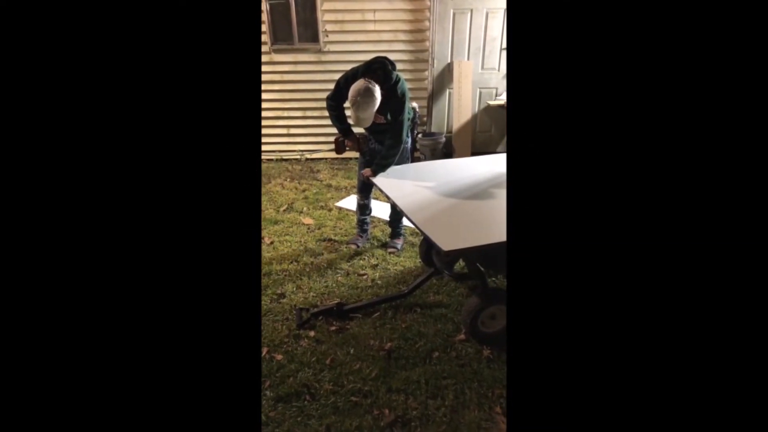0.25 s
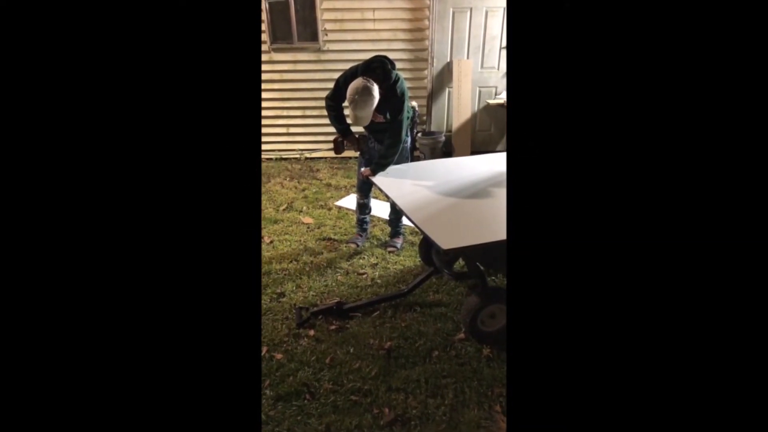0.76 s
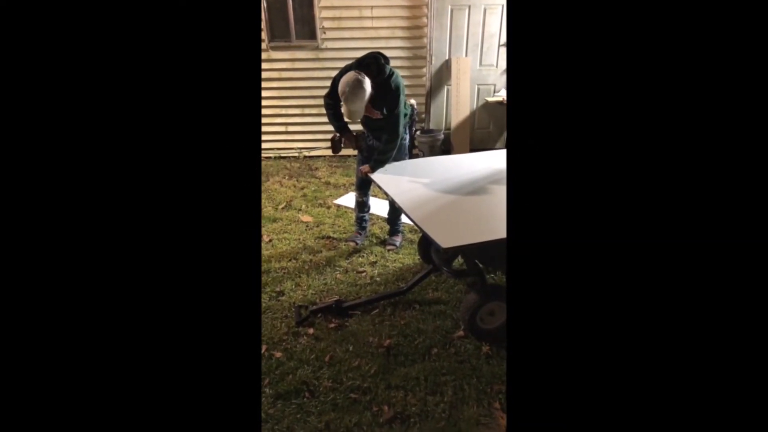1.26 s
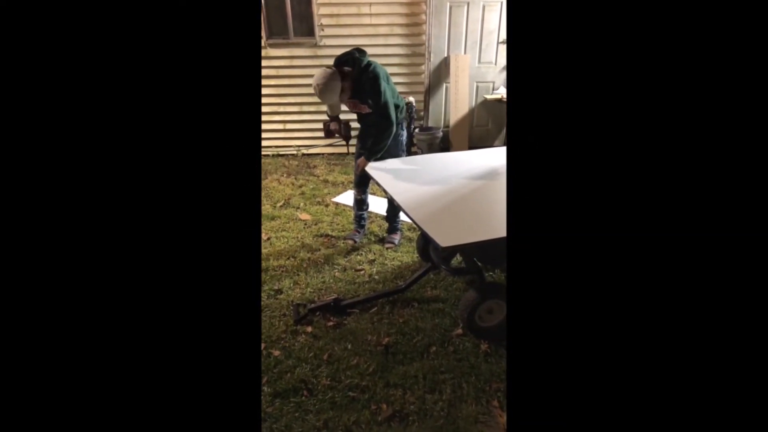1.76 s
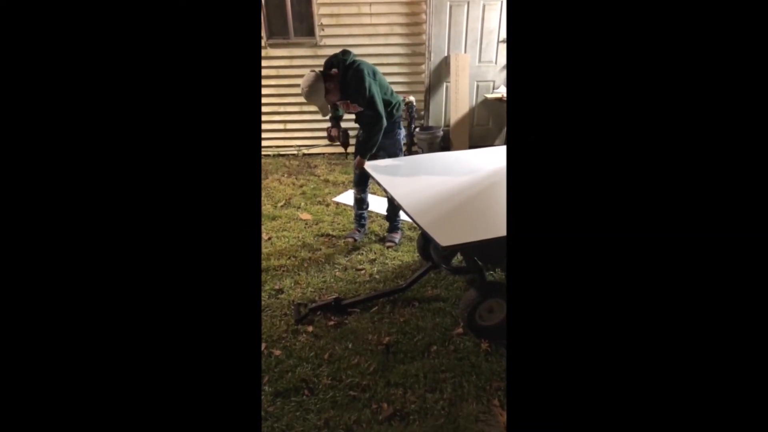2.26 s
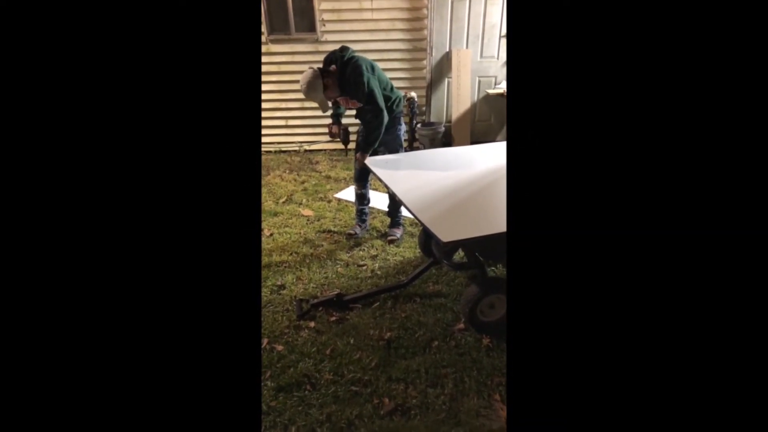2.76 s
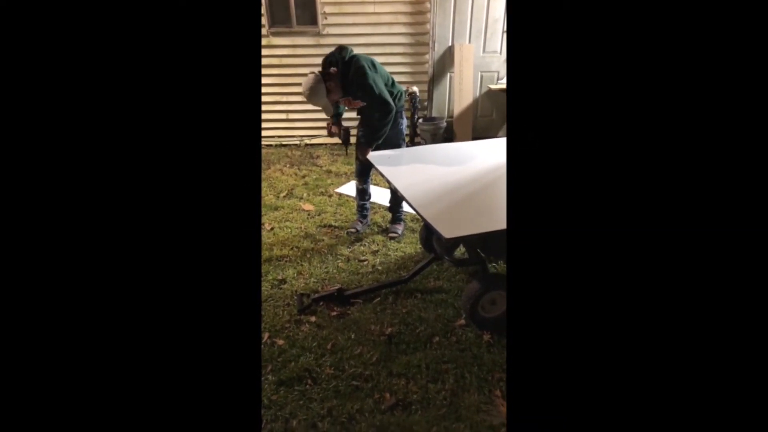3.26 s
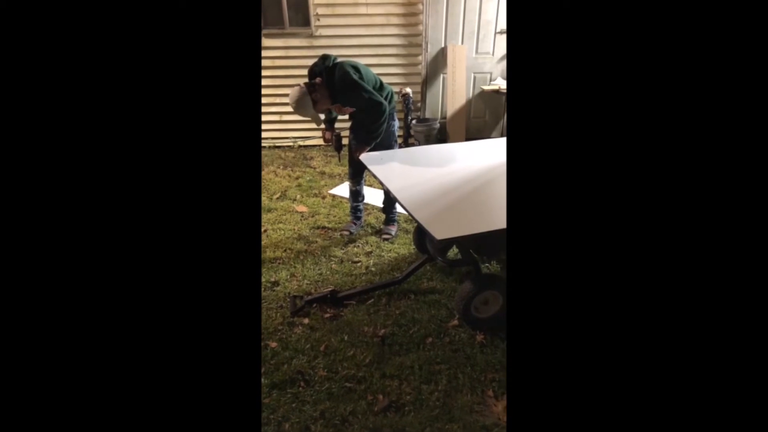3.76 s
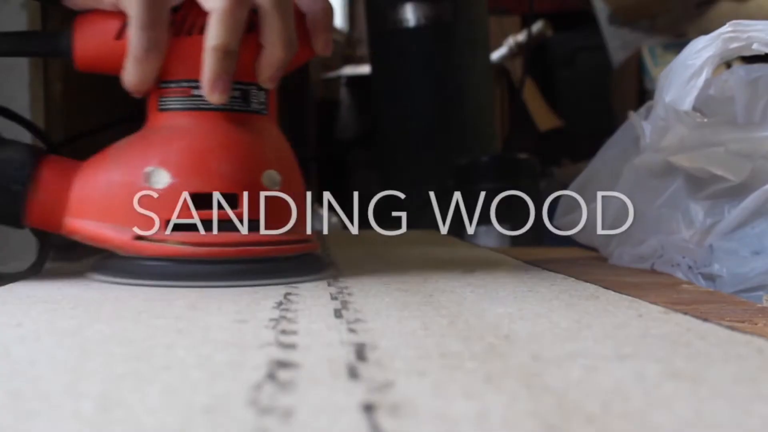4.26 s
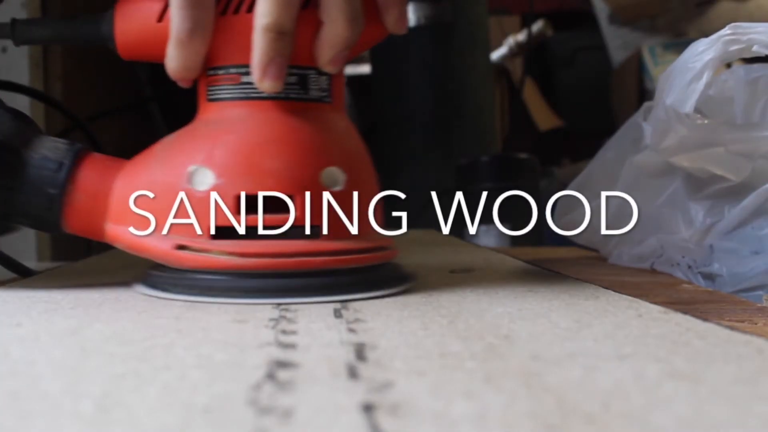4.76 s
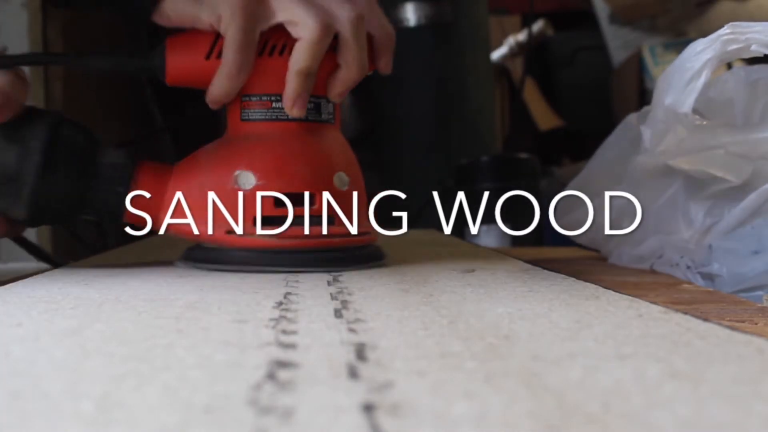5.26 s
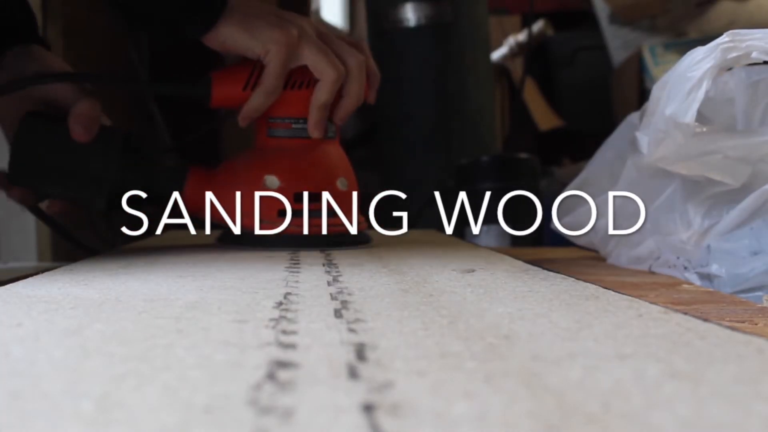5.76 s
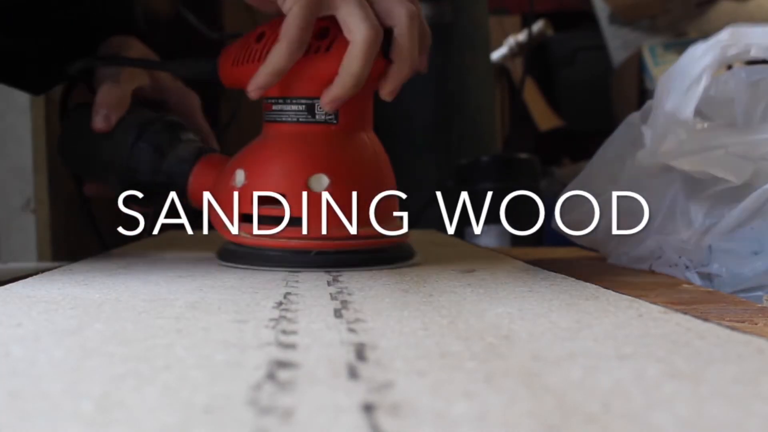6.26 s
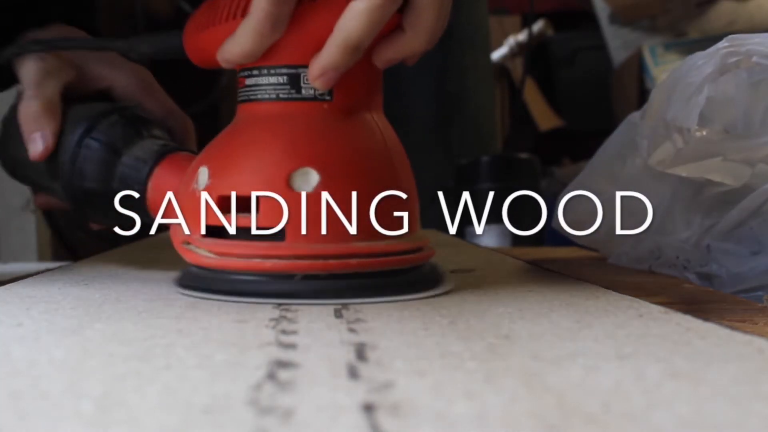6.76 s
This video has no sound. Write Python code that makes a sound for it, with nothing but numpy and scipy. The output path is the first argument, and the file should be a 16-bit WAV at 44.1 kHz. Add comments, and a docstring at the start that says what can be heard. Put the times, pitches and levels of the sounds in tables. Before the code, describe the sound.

An impact driver whines and briefly hammers a screw tight outdoors, then an orbital sander drones and rasps steadily on wood.

```python
"""In a quiet back yard an impact driver whines up, runs a screw in, slows under the load and hammers
it tight; a house wall answers. A few small handling clicks follow over distant machinery hum.
At about 4.2 s the scene cuts hard to a workshop: a random orbital sander, close by, is pressed onto
a wood panel and moved slowly about. Its weight shakes, its fan sings and its grit rasps, while the
panel drums and now and then bumps on the bench."""
import sys
import numpy as np
from scipy import signal
from scipy.fft import rfft, irfft, next_fast_len
from scipy.io import wavfile
from scipy.ndimage import uniform_filter1d, map_coordinates

SR = 44100
rng = np.random.default_rng(int(sys.argv[2]) if len(sys.argv) > 2 else 0)


def to_wav(sig):
    """Store sig (one row per channel, or 1-D mono) as 16-bit WAV at the path in sys.argv[1].

    Samples outside -1..1 are clipped; the rate is SR.
    """
    pcm = np.clip(np.atleast_2d(sig), -1, 1) * 32767
    pcm = np.round(pcm).astype(np.int16)
    wavfile.write(sys.argv[1], SR, pcm.T)  # frames by channels


N = 308685
T = np.arange(N) / SR
TRIGGER_S, SEATED_S, LET_GO_S = .435, .98, 1.15  # trigger pulled, screw seated, trigger let go

# hiss of grit on wood: f/Hz, level/dB (levels in all tables are relative)
GRIT = [(800, -23), (2000, 6.5), (3000, -1), (4000, 0.5), (5000, -1), (6500, 0), (8200, 0), (10500, -3),
        (12500, -12), (15000, -25), (15600, -47.5)]


def driver(level_db=-43.3, turns_per_chuck=4.35, whine_db=1, clatter_db=-8.5, gears_db=-1):
    """Motor and gear teeth whine through the case; the mesh tightens once each turn of the chuck."""
    # whine partials: multiple of the rotor, level/dB, throb/dB, gain at full load/dB
    partials = [(6.17, -10, 1, 0), (6.3, -9, 2, 0), (12.6, -10, 7, 8), (18, -6, 2, -5), (18.4, -11, 7, -3),
                (18.9, -13, 7, -3), (24.6, -17, 7, 13), (30, -8, .5, 0), (35, -11, 7, 0)]
    # gear case resonances: f/Hz, level/dB
    housing = [(600, -15), (1350, -7.5), (1700, -4), (2100, -9.5), (2800, -4), (3350, -3), (3900, -7),
               (4500, -7.5), (5050, -0.5), (5700, -6.5), (7000, -6.5), (8200, -6.5), (12000, -11.5)]
    # gear noise: f/Hz, level/dB
    gear_colour = [(47, -37.5), (80, -1.5), (107, -4), (185, -2.5), (544, -14), (903, -8.5), (1050, -13),
                   (1710, -4.5), (1910, -12), (3310, -12.5), (3620, -14), (5040, -5.5), (5750, -12),
                   (15500, -14.5)]
    rotor_hz, load, drive = driver_motion()
    rotor = angle(rotor_hz)
    throb = np.sin(rotor / turns_per_chuck + .2 * wobble(30))
    teeth = sum(amp(db + load_db * load + throb_db * (throb - .5))
                * tone(k * rotor + .06 * throb_db * wobble(130))
                for k, db, throb_db, load_db in partials)
    whine = amp(whine_db) * drive ** 3 * filtered(teeth, lambda hz: amp(along(housing, hz)))
    sharp_housing = [(hz, 2 * db) for hz, db in housing]  # backlash knocks ring the case sharply
    clatter = amp(clatter_db) * noise(sharp_housing, (1 + throb) ** 2)
    gears = amp(gears_db) * noise(gear_colour, amp(throb))
    return amp(level_db) * drive * (whine + clatter + gears)


def driver_motion(free_hz=275.5, loaded_hz=166, spin_up_s=.056, tighten_s=.06, brake_s=.012):
    """The rotor runs up, slows as the screw seats, then brakes: speed/Hz, load 0-1, drive 0-1."""
    run_up = 1 - np.exp(-np.maximum(T - TRIGGER_S, 0) / spin_up_s)
    load = np.exp(np.minimum(T - SEATED_S, 0) / tighten_s)
    drive = run_up * np.exp(-np.maximum(T - LET_GO_S, 0) / brake_s)
    return drive * (free_hz + (loaded_hz - free_hz) * load), load, drive


def hammer(snap_db=-5, crack_db=-1, thud_db=-1.8, clang_db=-7, bite_db=-24):
    """Each blow snaps and cracks on the steel anvil, thuds into the workpiece and rings the sheet."""
    # hammer blows: t/s, crack level/dB, thud level/dB
    blows = [(0.9877, -17.5, -25.5), (1.0137, -18.5, -22.5), (1.0412, -20.5, -21), (1.0667, -18, -21.5),
             (1.0955, -18, -19), (1.131, -23, -26), (1.147, -39, -30.5), (1.155, -44, -37),
             (1.162, -38.5, -56)]
    # bright leading snap: f/Hz, level/dB
    steel = [(2000, -20.5), (6000, -4), (10000, 4), (15500, -4)]
    # crack of the anvil: f/Hz, level/dB
    anvil = [(300, -17), (900, 4), (1700, -4.5), (3000, -2), (5000, 0), (7000, -7.5), (9500, -4.5),
             (12000, -14.5), (15500, -2.5)]
    # body of the thud: f/Hz, level/dB
    workpiece = [(30, -38.5), (70, -7.5), (135, -8), (186, 13.5), (252, -10.5), (341, 7), (400, -3.5),
                 (580, -11.5), (800, -9.5), (1730, -10), (2500, -15.5), (2800, -10), (5000, -31.5),
                 (9000, -60.5), (12000, -59.5)]
    # the sheet rattling under the screw head: f/Hz, level/dB
    rattle = [(400, -24), (1200, -3), (1700, 0), (2400, -2), (3500, -15), (8000, -36)]
    # the screw head grinding in, just ahead of the first blow: f/Hz, level/dB
    grind = [(200, -12), (750, 0), (1600, -7), (5000, -14), (12000, -26)]
    snap = sum(amp(db + snap_db) * decay(s, t60=.012, attack=.0005) for s, db, _ in blows)
    crack = sum(amp(db + crack_db) * decay(s, t60=.062, attack=.001) for s, db, _ in blows)
    thud = sum(amp(db + thud_db) * decay(s, t60=.145, attack=.0029) for s, _, db in blows)
    clang = sum(amp(db + clang_db) * decay(s, t60=.085, attack=.004) for s, _, db in blows)
    bite = amp(bite_db) * decay(SEATED_S - .002, t60=.07, attack=.005)
    ring = sheet_ring(blows)
    impact = snap * noise(steel) + crack * noise(anvil) + thud * noise(workpiece)
    return impact + clang * noise(rattle) + bite * noise(grind) + ring


def sheet_ring(blows, level_db=-4.5):
    """Every blow rings the fastened sheet; each mode takes a cycle or so to build up."""
    # sheet modes: f/Hz, level/dB, t60/s
    modes = [(75.4, -4.5, 0.25), (176, -9, .18), (296, -9, 0.24), (538, -12, .2), (748, -7, 0.12),
             (1007, -13, .15), (1216, -13.5, .15), (1410, -13.5, .16), (1588, -12.5, .16), (1635, -10, .16),
             (1846, -11.5, 0.1), (2250, -14, .15), (2850, -16, .15)]
    t = np.arange(SR // 2) / SR
    out = np.zeros(N)
    for s, _, thud_db in blows:
        ring = sum(amp(db + rng.normal(0, 2) - 60 * t / t60)
                   * np.sin(2 * np.pi * hz * t) * (1 - np.exp(-t * hz)) for hz, db, t60 in modes)
        out[round(s * SR):][:len(t)] += amp(thud_db + level_db) * ring
    return out


def sander(pad_ratio=.98, load_db_per_hz=.4, near_share=.4):
    """The shaft slows as the hand bears down; the free-spinning pad lags a little behind it."""
    # the push away and draw back: t/s, shaft f/Hz, shake level/dB, fan level/dB, grit level/dB
    stroke = [(4.24, 191.9, -19.5, -33.5, -30.5), (4.4, 188.7, -18, -32, -30.3),
              (4.65, 178, -20.5, -34, -30), (4.85, 174.7, -20, -31, -29.5),
              (5.25, 169.8, -21, -32.5, -30.4), (5.8, 168.4, -24.5, -26.5, -27.7),
              (6.15, 169, -24, -27.7, -28.4), (6.6, 171, -21.2, -24.8, -28.5), (7.0, 170.6, -21, -29, -29)]
    shaft_hz, shake_db, fan_db, grit_db = curves(stroke)
    shaft = angle(shaft_hz)
    orbit = pad_ratio * shaft + .22 * wobble(9)
    load_db = load_db_per_hz * (shaft_hz.min() - shaft_hz) + 1  # harder knocks as the motor slows
    near_db = near_share * (shake_db - shake_db[-1])  # more roar where the shake is strong
    drone = sander_motor(shaft, shake_db, fan_db) + drumming(shaft)
    return drone + sander_pad(orbit, load_db, near_db, grit_db) + bumps()


def sander_motor(shaft, shake_db, fan_db, mains_hz=60, ripple=.66, swing_rad=.37):
    """The eccentric weight shakes the tool; torque ripple at twice mains gives the fan sidebands."""
    # fan blade tones: multiple of the shaft, level/dB
    partials = [(12, -1), (24, -18.5)]
    # the fan tone sinks briefly: t/s, length/s, depth/dB
    dips = [(5.44, .1, 4), (6.06, .25, 14)]
    shake = amp(shake_db + .35 * wobble(22)) * tone(shaft)
    torque = angle(np.full(N, 2 * mains_hz))
    blades = sum(amp(db + wobble(40)) * tone(k * shaft + swing_rad * np.sin(torque) + .2 * wobble(35))
                 for k, db in partials)
    waver_db = 1.5 * wobble(16) - sum(db * swell(s, length) for s, length, db in dips)
    return shake + amp(fan_db + waver_db) * (1 + ripple * np.cos(torque)) * blades


def drumming(shaft, level_db=-1.3, far_end_s=5.8):
    """Shaft and pad both drive the panel's low tones, which throb as the two slide out of step."""
    # panel tones along the stroke: t/s, then level/dB at 2, 3 and 4 times the shaft speed
    levels = [(4.26, -42, -33, -28.5), (4.55, -35, -34, -28), (4.7, -30, -25.5, -23.5),
              (5.0, -32.5, -23, -22.8), (5.55, -31.5, -32, -28.5), (5.95, -24.5, -30, -32),
              (6.15, -26.5, -28, -30), (6.7, -28, -35, -24), (6.97, -28.5, -23, -26)]
    # throb of each tone: beat f/Hz, crest t/s
    throbs = [(12.3, 4.723), (13.35, 4.685), (13.7, 4.975)]
    depth = .74 * (1 - .6 * swell(far_end_s, length=1.3))  # calmer at the far end of the stroke
    out = np.zeros(N)
    for k, (db, (beat_hz, crest_s)) in enumerate(zip(curves(levels), throbs), 2):
        drive = k * shaft + .14 * wobble(20)
        slip = 2 * np.pi * beat_hz * (T - crest_s)
        pair = tone(drive) + depth * tone(drive - slip + .25 * wobble(20))
        out += amp(db + level_db + .6 * wobble(12)) * unit(pair)
    return out


def sander_pad(orbit, load_db, near_db, grit_db, panel_db=-22, rub_db=-7, scrape_db=3, rasp_follow=.42):
    """Once an orbit the pad knocks on the panel, chatters at its rim and drags grit over the wood."""
    # buzz of the knocking pad: multiple of the orbit, level/dB
    pad_partials = [(5, -17), (6, -16), (9, -23), (10, -29), (11, -28), (14, -26), (15, -20.5)]
    # buzz of the rim: multiple of the orbit, level/dB
    rim_partials = [(7, -8), (8, -4.5)]
    # roar of the rubbed panel: f/Hz, level/dB
    wood = [(25, -25), (70, -22.5), (120, -14.5), (230, -12.5), (310, -2), (420, 3), (600, 1.5),
            (780, -0.5), (950, -6), (1300, -12), (3000, -47)]
    # rasp of the rim: f/Hz, level/dB
    chatter = [(400, -30), (900, -10), (1300, 3.5), (1650, -10), (2300, -1.5), (2800, -3.5), (4000, -9),
               (8000, -39)]
    panel_gain = amp(panel_db + 1.1 * wobble(18))
    rim_db = rim_level()
    scrape = (.47 * np.cos(orbit) + .72 * np.cos(2 * orbit + wobble(6))
              + .42 * np.cos(3 * orbit + wobble(6.5)))
    contact = amp(scrape_db * scrape)
    knock = amp(load_db) * buzz(orbit, pad_partials)
    roar = amp(rub_db + near_db) * patchy(noise(wood, contact), depth_db=1.5)
    rasp_db = grit_db + rasp_follow * (rim_db - grit_db) - 1.3
    rasp = amp(rasp_db) * patchy(noise(chatter, contact), depth_db=3)
    grains = noise(GRIT, contact ** .33 * amp(2 * wobble(2500)))
    grit = amp(grit_db + .2 + .45 * wobble(35) + .4 * wobble(9)) * patchy(grains, depth_db=1.9)
    rim = amp(rim_db) * buzz(orbit, rim_partials)
    return panel_gain * (knock + roar) + rim + rasp + grit


def buzz(orbit, partials, rough_rad=.61):
    """Repeated knocks make harmonics of the orbit, unsteady in level and phase."""
    return sum(amp(db + 2 * wobble(14))
               * tone(k * orbit + rough_rad * wobble(45) + rng.uniform(0, 2 * np.pi))
               for k, db in partials)


def rim_level(flat_db=-37.3, waver_db=2.5):
    """The rim chatters lightly while the pad lies flat, and hard at each tilt: level/dB."""
    # pad tilts: t/s, length/s, level/dB
    tilts = [(5.38, .07, -31), (5.8, .14, -25.5), (6.06, .19, -25), (6.55, .08, -30), (6.8, .12, -28)]
    flat = amp(flat_db + waver_db * wobble(14))
    return 20 * np.log10(flat + sum(amp(db) * swell(s, length) for s, length, db in tilts))


def patchy(x, depth_db):
    """Narrow bands swell and sink at random as a nearby reflection shifts."""
    bands = signal.stft(x, nperseg=1024)[2]
    patches = uniform_filter1d(rng.standard_normal(bands.shape), size=5, axis=0)
    patches = uniform_filter1d(patches, size=9, axis=1)
    return unit(signal.istft(bands * amp(depth_db * unit(patches)), nperseg=1024)[1][:N])


def bumps():
    """The panel lifts and drops back on the bench: a soft thump, and the grit bites for an instant."""
    # panel drops: t/s, thump level/dB, rattle level/dB
    drops = [(4.28, -23, -35), (4.37, -25.5, -32), (4.475, -48, -26), (4.52, -39, -25.5), (4.6, -46, -24),
             (5.38, -36, -33), (5.975, -37, -24), (6.48, -38, -40), (6.83, -34, -40)]
    # thump of the bench: f/Hz, level/dB
    bench = [(25, -26), (55, -6), (80, -4.5), (110, -8), (200, 2), (350, -10), (700, -20), (2000, -46)]
    thump = sum(amp(db) * decay(s, t60=.33, attack=.004) for s, db, _ in drops)
    rattle = sum(amp(db) * decay(s - .004, t60=.095, attack=.0016) for s, _, db in drops)
    return thump * noise(bench) + rattle * noise(GRIT)


def handling(click_db=-8):
    """Small dry clicks and a rustle of cloth as the driver shifts in the hand."""
    # clicks: t/s, level/dB
    ticks = [(0.2543, -59), (1.4586, -51), (2.0028, -62), (2.4404, -56.5), (2.9208, -58), (3.2196, -57),
             (3.5513, -61)]
    # click colour: f/Hz, level/dB
    tick_colour = [(500, -23), (2500, 3), (4500, 4), (8000, -8), (12000, -3), (16000, -16)]
    # sleeve moves: t/s, level/dB, t60/s
    rustles = [(3.545, -60, .35), (3.66, -72, 5)]
    # cloth colour: f/Hz, level/dB
    cloth = [(500, -21), (1200, 4.5), (2000, -5), (2500, -1), (3300, -6.5), (4500, -3), (6000, -12.5),
             (12000, -26), (16000, -29.5)]
    clicks = sum(amp(db + click_db) * decay(s, t60=.05, attack=.0005) for s, db in ticks)
    sleeve = sum(amp(db) * decay(s, t60, attack=.012) for s, db, t60 in rustles)
    return clicks * noise(tick_colour) + sleeve * noise(cloth, amp(3 * wobble(120)))


def wall(x, wet_db=-14.5):
    """Wall and clutter scatter the sound into a short tail; the treble dies first."""
    hz, t, bands = signal.stft(rng.standard_normal(SR // 2), SR, nperseg=256)
    t60 = along([(150, .47), (2000, .49), (6000, .4), (14000, .22)], hz)
    tail = signal.istft(bands * amp(-60 * t / t60[:, None]), SR, nperseg=256)[1]
    return x + amp(wet_db) * signal.fftconvolve(x, tail / np.linalg.norm(tail))[:N]


def yard(air_db=-60, hum_db=-1):
    """A bed of still evening air with the wavering hum of distant machinery."""
    # machinery tones: f/Hz, level/dB
    hum_tones = [(118.4, -65), (140, -64.5), (177.6, -64), (242.2, -65), (279.9, -77), (360.7, -72.5),
                 (559.9, -79), (597.5, -83), (721.4, -78.5), (1480, -84.5), (2020, -85), (2482, -89),
                 (3350, -93)]
    # outdoor air: f/Hz, level/dB
    air = [(15, -54.5), (25, -25), (59, -4), (93, -5.5), (125, -5.5), (181, -3.5), (207, -8), (243, -10.5),
           (363, -8), (394, -14), (573, -17.5), (879, -21), (1540, -23), (2630, -30), (15000, -49.5)]
    hum = sum(amp(db + hum_db + .72 * wobble(3.1)) * tone(2 * np.pi * hz * T + .77 * wobble(6.7))
              for hz, db in hum_tones)
    return hum + amp(air_db) * noise(air)


def amp(db):
    """Decibels to gain."""
    return 10 ** (np.asarray(db) / 20)


def unit(x):
    """Scale to rms 1."""
    return x / np.sqrt(np.mean(x ** 2) + 1e-20)


def along(points, hz):
    """Read (f/Hz, value) points at hz, on a log frequency axis."""
    f, values = np.transpose(points)
    return np.interp(np.log(hz + 1), np.log(f + 1), values)


def curves(rows):
    """One automation curve for each column after the time."""
    times, *columns = np.transpose(rows)
    return [np.interp(T, times, column) for column in columns]


def wobble(rate):
    """A smooth random curve, rate knots a second."""
    return map_coordinates(rng.standard_normal(int(N * rate / SR) + 4), [T * rate])


def angle(hz):
    """The running angle of something that turns at hz."""
    return 2 * np.pi * np.cumsum(hz) / SR


def tone(phase):
    """A sine of rms 1."""
    return np.sqrt(2) * np.sin(phase)


def filtered(x, response):
    """Equalise x with a gain given as a function of frequency."""
    size = next_fast_len(N + 8192)
    return irfft(rfft(x, size) * response(np.fft.rfftfreq(size, 1 / SR)), size)[:N]


def noise(spectrum, gate=1):
    """Gated noise coloured by a spectrum, at rms 1."""
    return unit(filtered(gate * rng.standard_normal(N), lambda hz: amp(along(spectrum, hz))))


def decay(s, t60, attack):
    """The envelope of a hit at time s."""
    age = np.maximum(T - s, 0)
    return amp(-60 * np.minimum(age / t60, 3)) * (1 - np.exp(-age / attack))


def swell(s, length):
    """A smooth rise from 0 to 1 and back, centred on time s."""
    return np.cos(np.pi * np.clip((T - s) / length, -.5, .5)) ** 2


def scene(cut_s=4.2415, crossfade_s=.004):
    """First the yard, then a hard cut to the workshop."""
    outdoors = wall(driver() + hammer() + handling()) + yard()
    indoors = np.clip((T - cut_s) / crossfade_s + .5, 0, 1)
    return ((1 - indoors) * outdoors + indoors * sander())[None]


def record(dry):
    """A low cut clears the deepest rumble and a steep high cut trims the very top."""
    low_hz, top_hz = 35, 15800
    low_cut = lambda hz: hz ** 2 / np.hypot(hz ** 2, low_hz ** 2)
    high_cut = lambda hz: np.clip((top_hz - hz) / 200 + .5, 0, 1) ** 2
    return filtered(dry[0], lambda hz: low_cut(hz) * high_cut(hz))[None]


dry = scene()
out = record(dry)
to_wav(out)
```